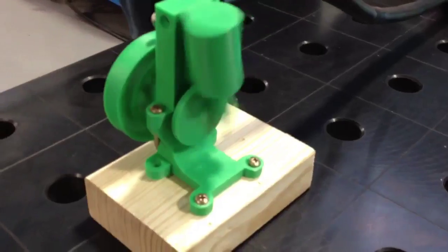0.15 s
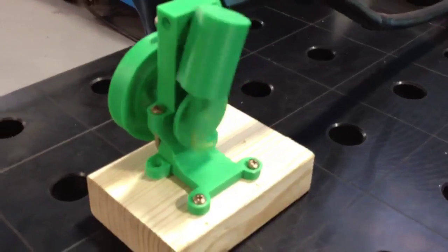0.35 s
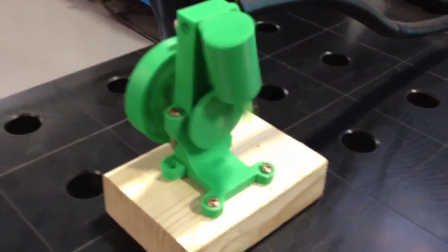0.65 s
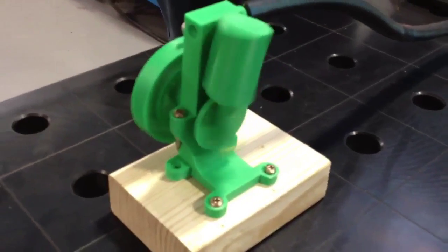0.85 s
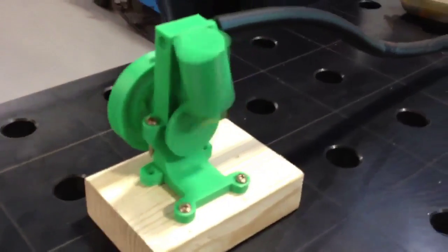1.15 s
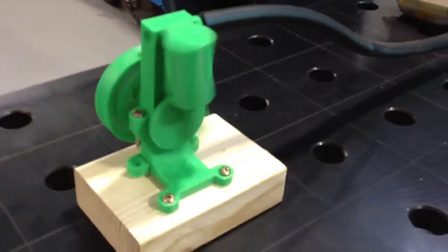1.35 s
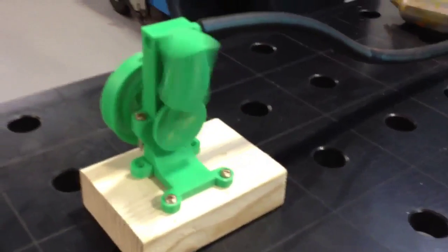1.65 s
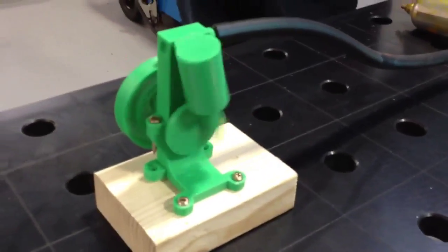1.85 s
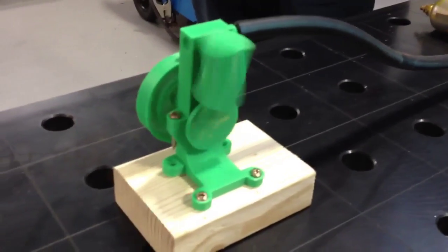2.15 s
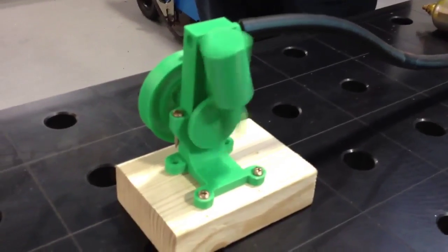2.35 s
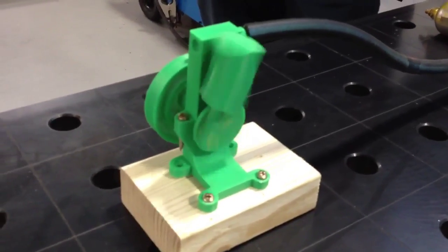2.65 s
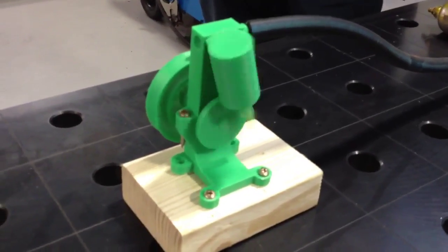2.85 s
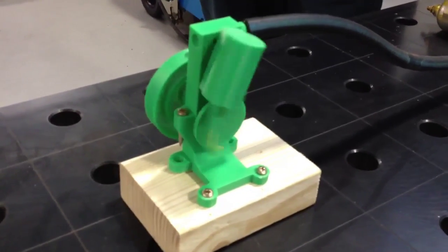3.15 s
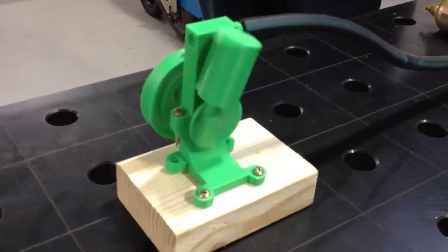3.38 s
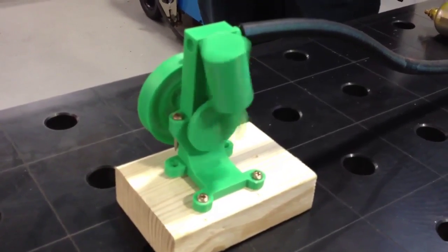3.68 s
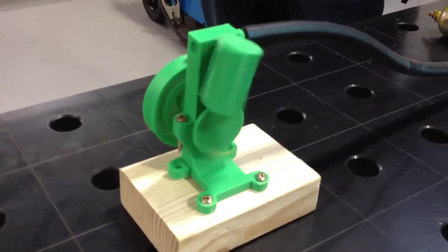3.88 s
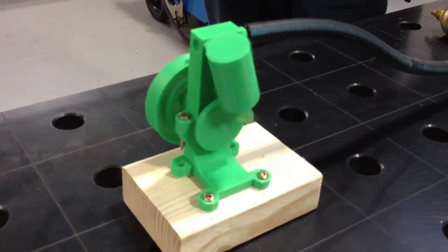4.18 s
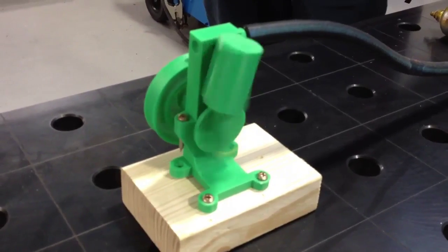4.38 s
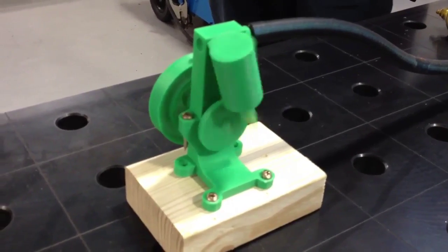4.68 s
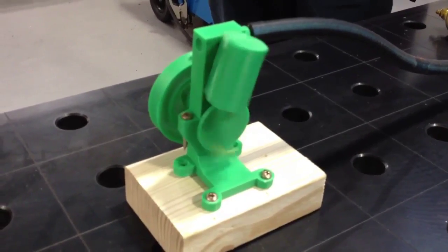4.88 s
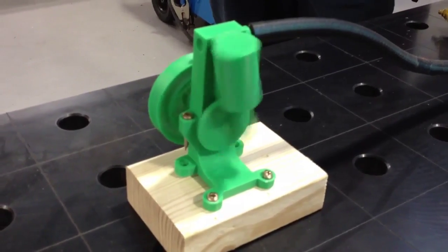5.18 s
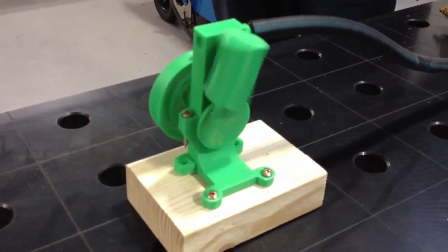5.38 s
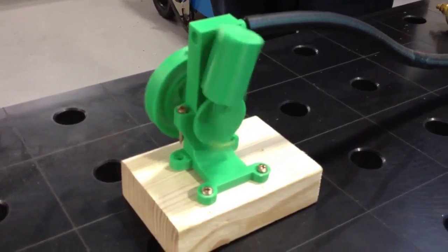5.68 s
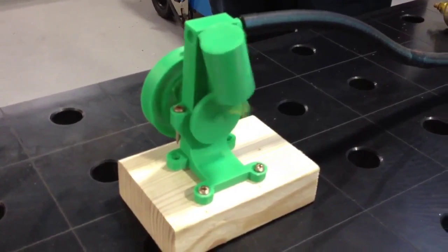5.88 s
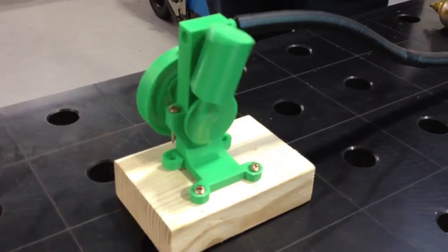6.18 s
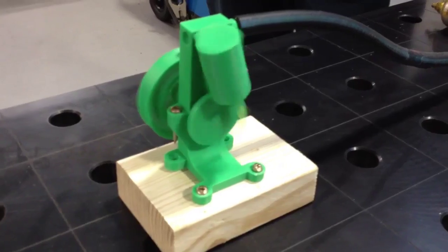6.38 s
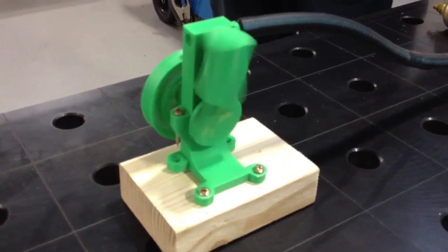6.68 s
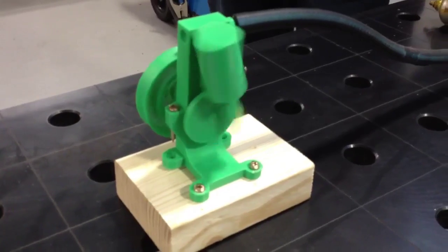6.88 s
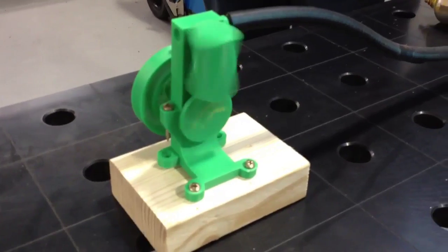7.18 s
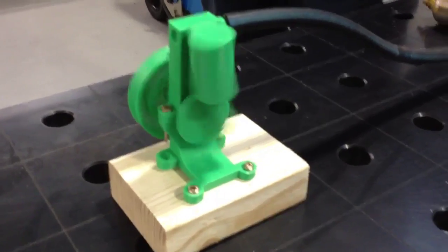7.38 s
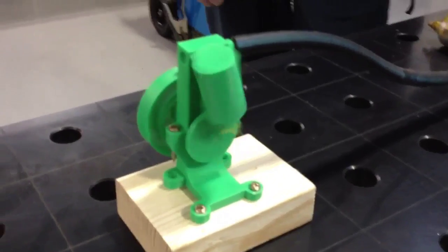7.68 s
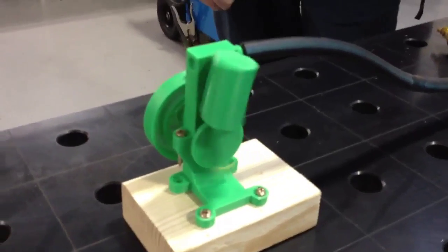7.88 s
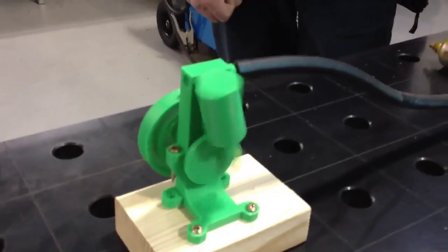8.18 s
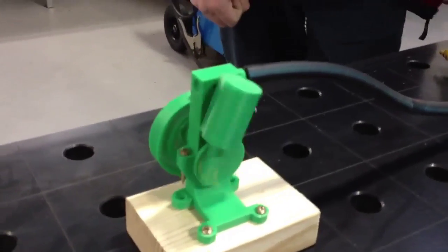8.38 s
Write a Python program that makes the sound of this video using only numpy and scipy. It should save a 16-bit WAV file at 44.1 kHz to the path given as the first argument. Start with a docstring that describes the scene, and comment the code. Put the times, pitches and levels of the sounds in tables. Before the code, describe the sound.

Close up in a workshop, rapid rhythmic air puffs and hisses pulse from a little air-driven engine, its loose parts ticking and clacking irregularly.

```python
"""In a workshop, close microphone: a small plastic oscillating-cylinder engine on a wood block runs on compressed
air, about eight turns a second. Each turn the exhaust opens with a thump (struck block modes) and a flat puff,
then the intake hisses while loose piston and crank clack (decaying plastic modes). Air leaks past the port face
all the time. Air sounds are coloured noise gated by crank angle; a faint wavering sine hums throughout."""
import sys
import numpy as np
from scipy import signal
from scipy.fft import rfft, irfft
from scipy.io import wavfile
from scipy.ndimage import uniform_filter1d

SR = 44100
rng = np.random.default_rng(int(sys.argv[2]) if len(sys.argv) > 2 else 0)


def master(y):
    """Save y as 16-bit WAV."""
    cut = np.clip(np.atleast_2d(y).T, -1, 1)
    pcm = np.round(cut * 32767)  # scale
    wavfile.write(sys.argv[1], SR, pcm.astype(np.int16))


N = 376613


def gain_of(db):
    """Decibels to amplitude gain."""
    return 10 ** (np.asarray(db) / 20)


def curve(table, x):
    """Linear interpolation through a two-column table."""
    return np.interp(x, *np.transpose(table))


def evened(x):
    """Scales to rms 1."""
    return x / np.sqrt(np.mean(x ** 2) + 1e-20)


def smoothed_twice(x, size):
    """Two moving averages in a row along the last axis."""
    return uniform_filter1d(uniform_filter1d(x, size), size)


def hiss(colour, peaks=()):
    """Turbulent air: rms-1 noise, broad spectrum plus cavity resonances added as power."""
    f_hz = np.fft.rfftfreq(N, 1 / SR)
    knot_hz, knot_db = np.transpose(colour)
    broad_db = np.interp(np.log(f_hz + 1), np.log(knot_hz + 1), knot_db)
    power = gain_of(2 * broad_db)  # factor 2: amplitude gain to power
    for centre_hz, width_hz, top_db in peaks:
        power += gain_of(2 * top_db) / (1 + (2 * (f_hz - centre_hz) / width_hz) ** 2) ** 2
    spectrum = rfft(rng.standard_normal(N)) * np.sqrt(power)
    return evened(irfft(spectrum, N))


def flutter(depth_db, size):
    """Unsteady flow: random gain of rms depth_db, wandering over about size samples."""
    return gain_of(depth_db * evened(smoothed_twice(rng.standard_normal(N), size)))


def ring(modes, rise_s=0.00012):
    """Struck part: sum of exponentially decaying sines, peak 1."""
    t = np.arange(3000) / SR
    sound = sum(gain_of(db - 60 * t / t60) * np.sin(2 * np.pi * hz * t) for hz, db, t60 in modes)
    sound *= 1 - np.exp(-t / rise_s)
    return sound / abs(sound).max()


# flywheel speed: t/s, speed/(turns/s)
FLYWHEEL_SPEED = [(0.0, 8.201), (0.7, 8.257), (1.3, 8.363), (2.1, 7.926), (2.9, 8.315), (3.3, 8.19),
                  (3.85, 8.415), (4.35, 8.021), (5.25, 7.569), (5.7, 7.402), (6.2, 7.689), (6.95, 7.96),
                  (7.35, 7.768), (8.0, 7.485), (8.54, 7.738)]
START_TURNS = 0.00801  # crank angle at t = 0, after exhaust opening


def crank(share=0.):
    """Times/s at which the crank, its speed integrated to angle, passes this share of each turn."""
    t = np.arange(N) / SR
    angle_turns = START_TURNS + np.cumsum(curve(FLYWHEEL_SPEED, t)) / SR
    passes = np.arange(int(angle_turns[-1]) + 2) + share
    return np.interp(passes, angle_turns, t, right=np.inf)


# broad colours: f/Hz, relative density/dB; resonances: f/Hz, width/Hz, relative density/dB
EXHAUST_COLOUR = [(300, -29.5), (1000, -15.5), (2200, -11), (3700, -8.5), (5200, -15.5), (7500, -3),
                  (10500, -5.5), (13500, -5.5), (14700, -22), (15200, -6.5)]
EXHAUST_RESONANCES = [(1226, 210, -10), (1700, 260, -3.5), (2910, 430, -7.5), (4410, 630, -1),
                      (6450, 380, 1.5), (6800, 440, 2), (8060, 660, -3.5), (9730, 320, -3),
                      (11860, 900, -6.5)]
INTAKE_COLOUR = [(300, -30), (900, -14), (2200, -26.5), (3300, -6.5), (5400, -22), (7500, -16), (10000, -7),
                 (12500, -7), (15200, -11.5)]
INTAKE_RESONANCES = [(890, 250, -14), (1303, 190, -6), (3670, 160, -2.5), (4424, 380, 2), (7000, 280, -5),
                     (8160, 1300, 3), (9160, 200, -0.5)]
LEAK_COLOUR = [(350, -37), (450, -23), (600, -13.5), (900, -11), (1050, -26), (2200, -19.5), (3500, -7),
               (5200, -12), (5700, -8.5), (6300, -3.5), (9000, -5), (11500, -11), (13500, -9), (14600, -13),
               (15200, -5.5)]
LEAK_RESONANCES = [(1320, 370, -9.5), (1714, 350, -9.5), (4640, 390, -2.5), (7030, 660, 3.5),
                   (8350, 470, -0.5)]
# thin jet as the ports pass: f/Hz, relative density/dB
FIZZ_COLOUR = [(7000, -34), (10000, 1), (12000, 3.5), (14000, 2), (15200, -2)]
# shop air and the shaking table: f/Hz, relative density/dB
RUMBLE_COLOUR = [(30, -16), (70, -28), (100, -11), (154, -1), (320, 1), (367, -4), (409, -7), (600, -4),
                 (900, -22.5)]
# flow through one turn: share of turn, relative level/dB
INTAKE_FLOW_DB = [(0, -15), (.33, -19), (.42, -7.5), (.52, 2.5), (.6, -3), (.69, -3.5), (.8, -4.5),
                  (.9, -16.5), (1, -12)]
FIZZ_FLOW_DB = [(0, 1), (.3, -12), (.38, 3.5), (.45, 0.5), (.52, 1.5), (.8, -21), (.87, -14), (.93, 3),
                (1, -2)]
RUMBLE_FLOW_DB = [(0, 8.5), (.12, 0), (.3, -1.5), (.37, 1), (.6, 2.5), (.83, 0), (.92, 3.5), (1, 4)]
# base levels
EXHAUST_DB, INTAKE_DB, LEAK_DB, FIZZ_DB, RUMBLE_DB = -18, -20.5, -23, -27, -46.5
OPEN_SHARE, OPEN_SPREAD = 0.32, 0.024  # share of a turn the exhaust stays open
START_DB, END_DB = 0.5, -1.15  # exhaust pressure after opening, before closing
LATE_DB = 1.0  # fizz boost just before the port opens
PUFF_SPREAD_DB, INTAKE_SPREAD_DB, FIZZ_SPREAD_DB = 1.1, 1, 2.5  # turn to turn


def air():
    """Exhaust puff, intake hiss, port fizz and rumble follow the crank; the leak is steady."""
    opens_s, t = crank()[:-1], np.arange(N) / SR
    turn = np.searchsorted(opens_s, t, side="right") - 1
    turn_s = 1 / curve(FLYWHEEL_SPEED, opens_s)[turn]
    since_s = t - opens_s[turn]
    share = since_s / turn_s
    wide, start, end, suck, late = rng.standard_normal((len(opens_s), 5))[turn].T

    open_s = (OPEN_SHARE + OPEN_SPREAD * wide) * turn_s
    rising = np.clip(since_s / 0.0068, 0, 1)
    closing = np.clip((open_s + 0.005 - since_s) / 0.0058, 0, 1)
    start_db = START_DB + PUFF_SPREAD_DB * start
    end_db = END_DB + PUFF_SPREAD_DB * end
    rush_db = 3.8 * np.exp(-np.maximum(since_s - 0.005, 0) / 0.0031)  # strongest first
    pressure_db = rush_db + start_db + (end_db - start_db) * np.clip(since_s / open_s, 0, 1)
    exhaust = gain_of(EXHAUST_DB + pressure_db) * rising * closing
    exhaust *= flutter(1.5, size=40) * flutter(0.61, size=300)

    intake_db = INTAKE_DB + INTAKE_SPREAD_DB * suck + curve(INTAKE_FLOW_DB, share)
    intake = gain_of(intake_db) * flutter(1.9, size=70)

    before_opening = np.clip((share - 0.75) / 0.1, 0, 1) * np.clip((1 - share) / 0.038, 0, 1)
    late_db = (LATE_DB + FIZZ_SPREAD_DB * late) * before_opening
    fizz = gain_of(FIZZ_DB + late_db + curve(FIZZ_FLOW_DB, share)) * flutter(2.9, size=200)

    rumble = gain_of(RUMBLE_DB + curve(RUMBLE_FLOW_DB, share)) * flutter(1.16, size=500)
    leak = gain_of(LEAK_DB) * flutter(2.1, size=150)

    out = exhaust * hiss(EXHAUST_COLOUR, EXHAUST_RESONANCES)
    out += intake * hiss(INTAKE_COLOUR, INTAKE_RESONANCES)
    out += fizz * hiss(FIZZ_COLOUR)
    out += leak * hiss(LEAK_COLOUR, LEAK_RESONANCES)
    return out + rumble * hiss(RUMBLE_COLOUR)


# wood block on the table: f/Hz, relative level/dB, t60/s
WOOD_BLOCK_MODES = [(170, -22, 0.027), (300, 8.5, 0.047), (649, 13, 0.03), (910, -5, 0.025)]
# openings that jolt the block hardest: t/s, level over THUMP_DB/dB
HARD_JOLTS = [(.119, 7), (.243, 6), (.969, 10), (3.171, 8), (3.654, 8), (5.951, 6), (6.342, 5), (7.233, 6),
              (8.018, 9), (8.412, 10)]
THUMP_DB, THUMP_SPREAD_DB = -34, 3.0


def thumps():
    """Sudden pressure release at each exhaust opening rings the wood block."""
    opens_s = crank()[:-1]
    above_db = THUMP_SPREAD_DB * rng.standard_normal(len(opens_s)) - 0.5
    for s, db in HARD_JOLTS:
        above_db[abs(opens_s - s).argmin()] = db
    clicks = np.zeros(N)
    clicks[np.round(opens_s * SR).astype(int)] = gain_of(THUMP_DB + above_db)
    return signal.oaconvolve(clicks, ring(WOOD_BLOCK_MODES))[:N]


# faint tone before waver: t/s, rms level/dB
HUM_LEVEL = [(0, -55.5), (1, -58), (2, -61), (3, -56.5), (4.6, -55.5), (5.9, -62), (7.2, -59), (7.32, -52),
             (7.63, -48), (7.72, -64), (8.3, -59), (8.54, -50)]
# brief soft tones near the end: t/s, length/s, f/Hz, rms level at crest/dB
SOFT_BLIPS = [(8.387, 0.045, 292, -39), (8.447, 0.075, 340, -45), (8.482, 0.061, 462, -39.5)]
HUM_HZ, HUM_DRIFT_HZ, HUM_WAVER_DB = 332.6, 1.227, 4  # centre, rms drift, rms waver


def hum():
    """Sine with slightly drifting pitch and wavering level, plus short half-sine-shaped tones."""
    t = np.arange(N) / SR
    drift_hz = HUM_DRIFT_HZ * evened(uniform_filter1d(rng.standard_normal(N), size=6000))
    level = gain_of(curve(HUM_LEVEL, t)) * flutter(HUM_WAVER_DB, size=3000)
    out = level * np.sqrt(2) * np.sin(2 * np.pi * np.cumsum(HUM_HZ + drift_hz) / SR)
    for s, length_s, hz, db in SOFT_BLIPS:
        swell = np.sin(np.pi * np.clip((t - s) / length_s, 0, 1))
        out += gain_of(db) * np.sqrt(2) * swell * np.sin(2 * np.pi * hz * t)
    return out


# hardest clacks of piston and crank:
# t/s, high-mode peak/dB, low modes re high modes/dB, favoured f/Hz
HARD_CLACKS = [(0.185, -6, -10, 6800), (0.203, -9, -6, 6800), (0.43, -7, -16, 8000), (0.4318, -5, -9, 8500),
               (0.552, -7, -17, 8400), (0.673, -3.5, -12, 8100), (0.7963, -9.5, -6, 8000),
               (0.9041, -9, -18, 7900), (0.9142, -5.5, -12, 6900), (1.2762, -6, -8, 8000),
               (1.2958, -7.5, -21, 9300), (1.415, -5, -15, 9240), (1.5751, -9, -21, 7000),
               (1.76, -3.5, -10, 8000), (1.78, -10.5, -10, 9300), (1.881, -6, -7, 7900),
               (2.1965, -8, -8, 6700), (2.2593, -8, -8, 8000), (2.5409, -9, -18, 7000),
               (2.57, -11, -7, 7100), (2.694, -7, -9, 7000), (2.752, -6.5, -5.5, 8400),
               (2.7699, -8, -7, 8300), (2.8733, -6.5, -10, 8200), (2.9904, -2, -6, 8200),
               (3.235, -11, -4, 8100), (3.6002, -13.5, 2, 8200), (4.323, -5.5, -8, 7990),
               (4.4491, -7, -17, 8200), (4.5788, -8, -4, 8200), (5.2184, -6, -17, 8200),
               (5.221, -8, -19, 8200), (5.2875, -7, -17, 6460), (5.418, -16, -3, 8200),
               (5.821, -7, -19, 6700), (5.8865, -3.5, -7, 8090), (6.0869, -11, -8, 6800),
               (6.2812, -4.5, -14, 8100), (6.4108, -10, -1, 8400), (6.4745, -12, -14, 8500),
               (6.54, -5, -7, 8100), (6.607, -6, -17, 6900), (6.795, -7, -10, 8040),
               (6.8591, -9, -17, 8100), (6.89, -8, -13, 6400), (6.919, -5, -14, 8000),
               (6.9823, -8, -20, 7000), (7.3016, -9.5, -7, 8400), (7.4424, -8.5, -3, 9160),
               (7.5575, -7.5, -9, 8100), (7.82, -5.5, -10, 7800), (8.09, -9, -18, 8400),
               (8.219, -11, -10, 8100), (8.4325, -9, -19, 9700), (8.482, -15, -7, 9300)]
# where loose parts take up their play: share of turn, scatter/s, chance (0-1),
# high-mode peak/dB, low modes re high modes/dB, favoured f/Hz, spread of favoured f/Hz
LOOSE_PLAY = [(.03, .0012, .6, -17, -11, 7300, 700), (.53, 0.0011, 1, -12, -7.5, 8200, 250),
              (.67, .003, 0.4, -14.5, -9.5, 8200, 600)]
PLAY_SPREAD_DB, LOW_SPREAD_DB = 2.5, 5


def light_clacks():
    """Lighter clacks as play is taken up each turn, none within 8 ms of a hard one."""
    hard_s, rows = np.array(HARD_CLACKS)[:, 0], []
    for share, scatter_s, chance, db, low_db, hz, spread_hz in LOOSE_PLAY:
        s = crank(share)
        time_dev, level_dev, low_dev, pitch_dev = rng.standard_normal((len(s), 4)).T
        s = abs(s + scatter_s * time_dev)
        clear = abs(s[:, None] - hard_s).min(axis=1) > 0.008
        heard = (rng.random(len(s)) < chance) & (s < N / SR) & clear
        columns = [s, db + PLAY_SPREAD_DB * level_dev, low_db + LOW_SPREAD_DB * low_dev,
                   hz + spread_hz * pitch_dev]
        rows += np.transpose(columns)[heard].tolist()
    return rows


# brief ring of the plastic parts: f/Hz, relative level/dB, t60/s
PLASTIC_HIGH_MODES = [(6430, 0, 0.0074), (6900, 5.5, 0.013), (8300, -13, .008), (8073, 28.5, 0.011),
                      (7900, -5, .01), (9230, 8, 0.0096), (9800, -4, .006)]
PLASTIC_LOW_MODES = [(4428, 19, 0.017), (3380, -32, .01), (1704, 2.5, 0.021), (1310, -25.5, 0.013),
                     (2820, 2.5, 0.016)]


def clacks():
    """Impacts ring the plastic, favouring modes near each clack's pitch; a weak rebound follows."""
    rows = HARD_CLACKS + light_clacks()
    out, chance = np.zeros(N + SR), rng.random((len(rows), 2))
    for (s, db, low_db, hz), (late, size) in zip(rows, chance):
        favoured = [(f, top_db - 13.3 * min(abs(f - hz) / 500, 2.5), t60)
                    for f, top_db, t60 in PLASTIC_HIGH_MODES]
        sound = gain_of(db) * (ring(favoured) + gain_of(low_db) * ring(PLASTIC_LOW_MODES))
        for delay_s, gain in (0, 1), (0.001 + 0.0036 * late, 0.26 * size):
            at = round((s + delay_s) * SR)
            out[at:at + len(sound)] += gain * sound
    return out[:N]


# microphone drifting round the engine: t/s, share of side view, share of low view
MIC_AIM = [(0, 0.63, 0.061), (.8, 0.79, 0), (1.6, 0.87, 0.21), (2.4, 0.26, 0.09), (3.4, 0.021, 0),
           (4.4, 0.1, 0.2), (5.4, 0, 0.022), (6.4, 0, 0.12), (7.2, .3, 0.16), (7.75, 0.74, 0.16),
           (8, 0.83, 0.96), (8.54, 0, 0.82)]
# colour of each view: f/Hz, gain/dB
SIDE_COLOUR = [(1000, -0.5), (2500, -1), (4200, 1), (4700, -1), (5600, 0), (6800, -1), (9300, 2),
               (11000, -1), (12300, -3), (13800, 2.5), (14700, -5), (15300, 0)]
LOW_COLOUR = [(1000, -0.5), (1700, 3.5), (2800, -0.5), (4500, 2), (5700, 6), (6800, -5), (8500, 3.5),
              (10300, 3.5), (12300, 4), (14200, 3), (15300, 3)]


def aimed(x):
    """Time-varying colour of the moving microphone; small time-frequency patches flicker."""
    f_hz, t, z = signal.stft(x, SR, nperseg=512)
    s, side, low = np.transpose(MIC_AIM)
    side_db = np.outer(curve(SIDE_COLOUR, f_hz), np.interp(t, s, side))
    low_db = np.outer(curve(LOW_COLOUR, f_hz), np.interp(t, s, low))
    across_f = uniform_filter1d(rng.standard_normal(z.shape), size=4, axis=0)
    patches = evened(uniform_filter1d(across_f, size=6, axis=1))
    coloured = z * gain_of(side_db + low_db + 1.24 * patches)
    return signal.istft(coloured, SR, nperseg=512)[1][:N]


def shop(x, t60_s=0.46):
    """Sparse decaying reflections off table and walls, random in sign."""
    at = np.arange(100, 9000, 20) + rng.integers(0, 20, 445)
    taps = np.zeros(9020)
    taps[at] = rng.choice([-1., 1.], len(at)) * gain_of(-60 * at / SR / t60_s)
    return signal.oaconvolve(x, taps / np.linalg.norm(taps))[:N]


def scene():
    """Engine through the moving microphone, a little room, and the hum."""
    engine = aimed(air() + thumps() + clacks())
    return (engine + gain_of(-16.0) * shop(engine) + hum())[None]


# overall level, falling after two sharp clacks and creeping back: t/s, gain/dB
OVERALL_LEVEL = [(0, 0.5), (2.99, 0), (3.0, -1), (4.9, -.5), (5.22, 0), (5.23, -4), (6, -2), (7.5, -0.5),
                 (8.54, -0.5)]
BASS_CUT_HZ, EDGE_HZ = 110, 15300


def record(dry):
    """Slow level changes, soft overload, the microphone's bass cut, then the band limit."""
    level = gain_of(curve(OVERALL_LEVEL, np.arange(N) / SR))
    rounded = 1.05 * np.tanh(dry * level / 1.05)
    bass_cut = signal.butter(2, BASS_CUT_HZ, "high", fs=SR, output="sos")
    thin = signal.sosfilt(bass_cut, rounded)
    band_limit = signal.firwin(1023, EDGE_HZ, window=("kaiser", 7), fs=SR)
    return signal.oaconvolve(thin, band_limit[None], "same")


dry = scene()
out = record(dry)
master(out)
```